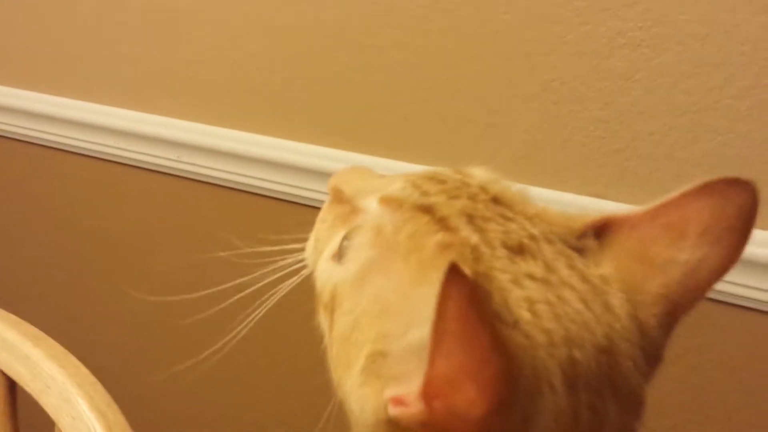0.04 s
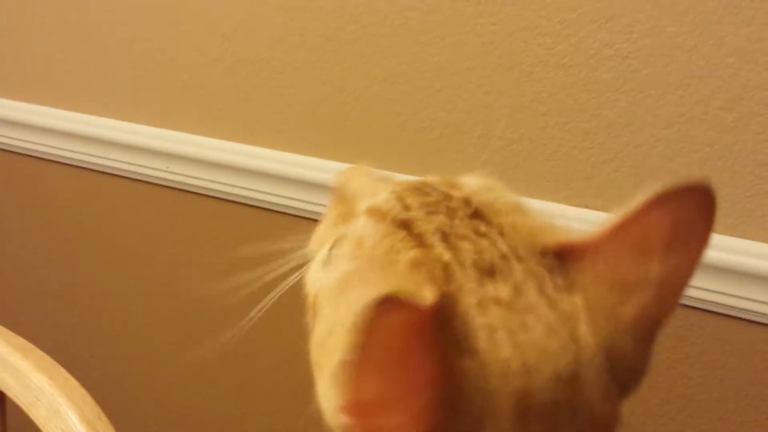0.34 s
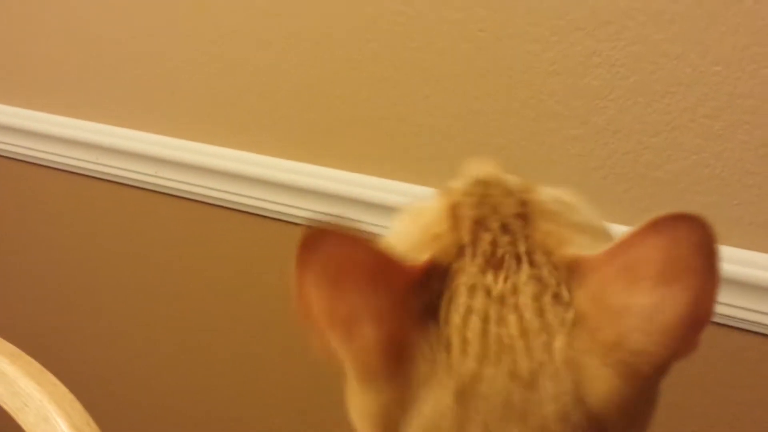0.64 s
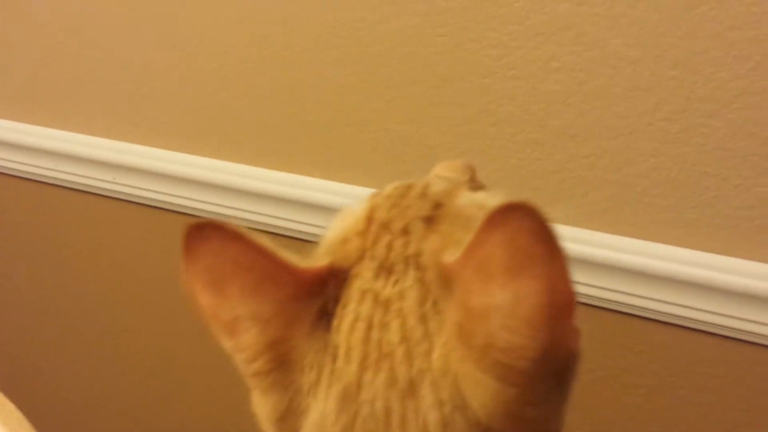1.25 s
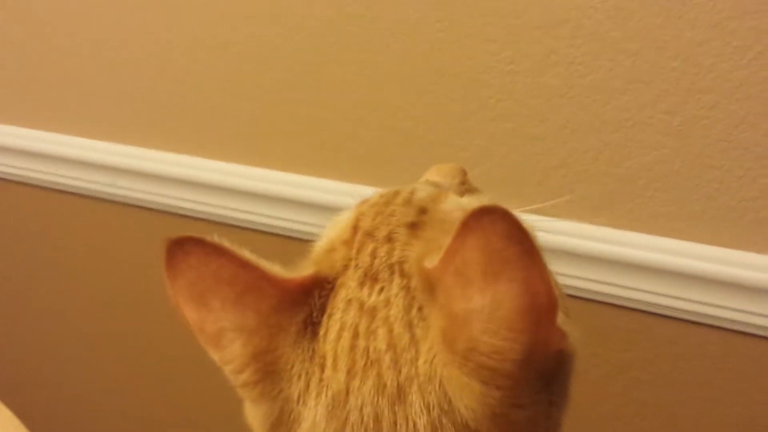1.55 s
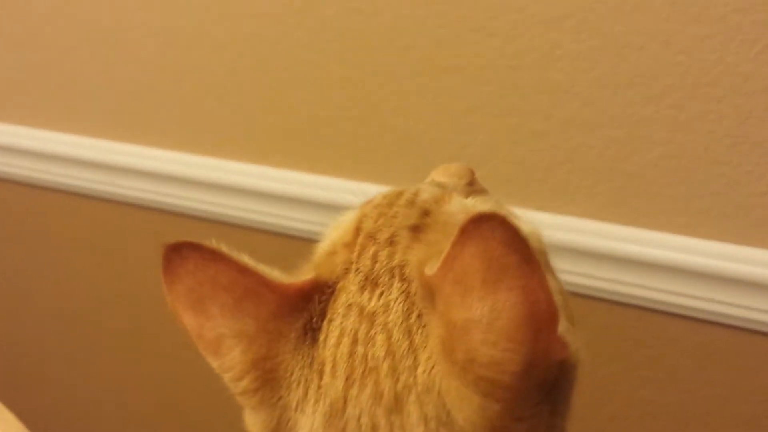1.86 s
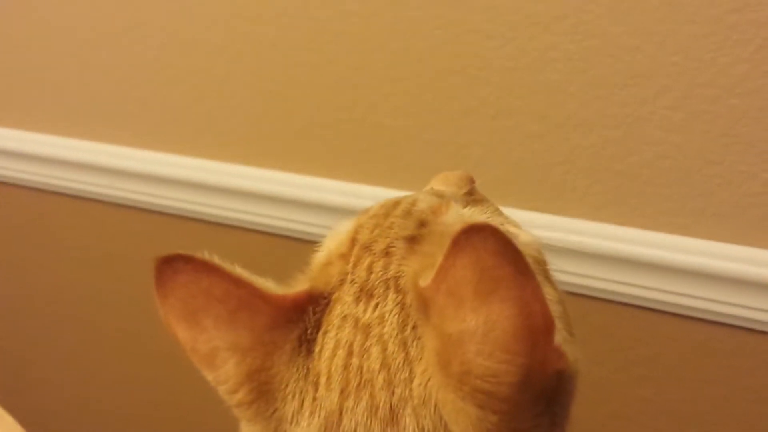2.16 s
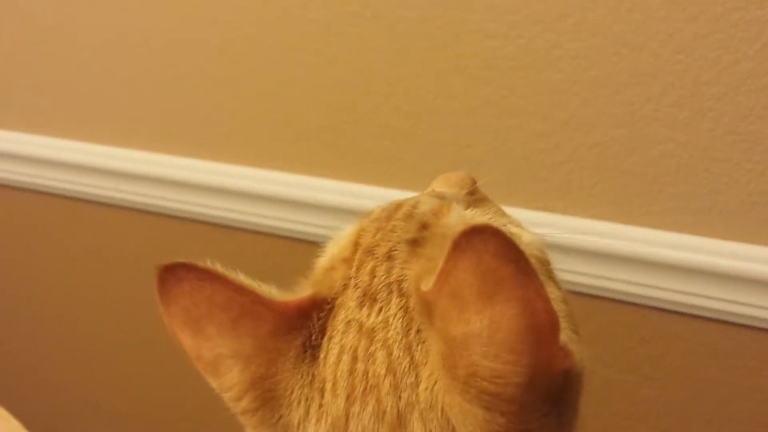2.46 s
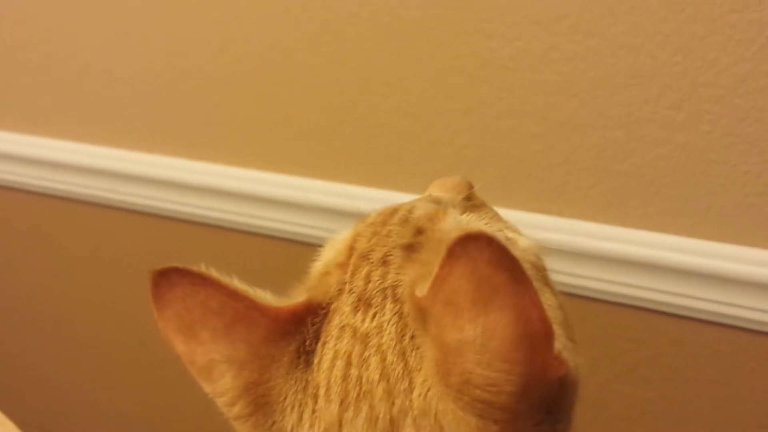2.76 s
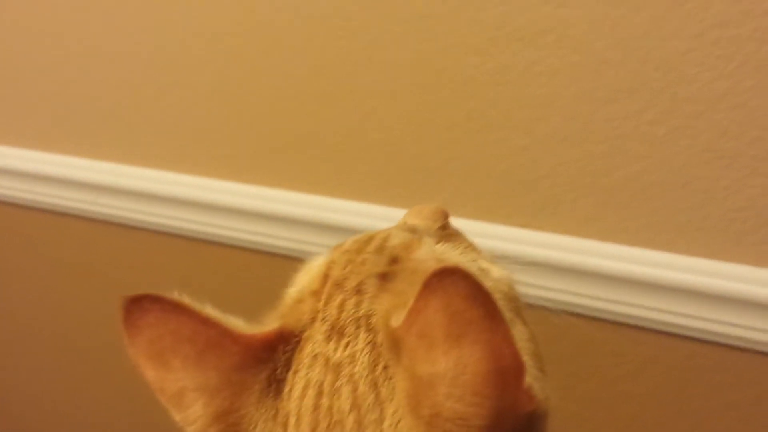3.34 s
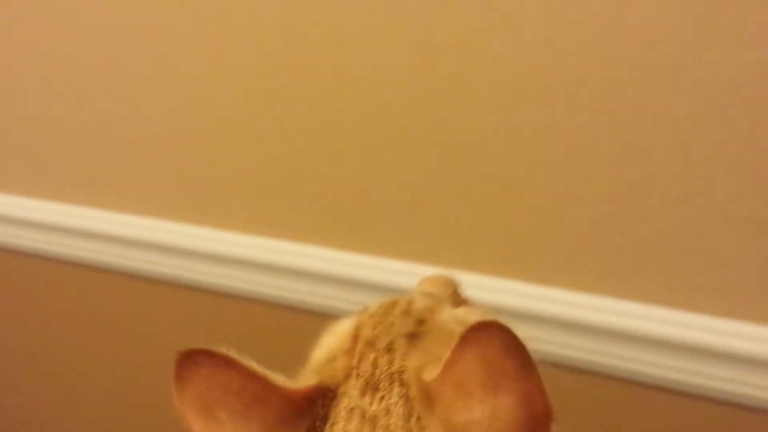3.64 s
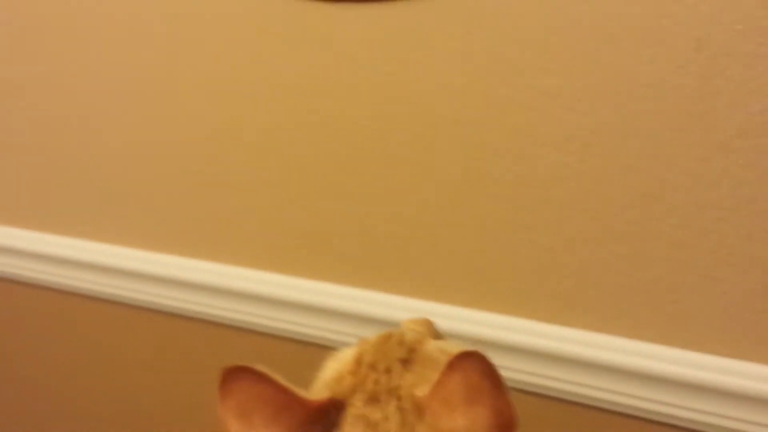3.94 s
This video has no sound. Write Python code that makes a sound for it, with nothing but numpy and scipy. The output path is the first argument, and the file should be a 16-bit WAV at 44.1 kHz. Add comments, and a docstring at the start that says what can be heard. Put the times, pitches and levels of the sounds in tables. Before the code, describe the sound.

A cat close to the microphone chatters in seven short, slightly raspy chirps, with faint breathy puffs between them. It sounds a little to the left in a small room, over steady room noise and a low appliance hum.

```python
"""A cat close to the microphone chatters at something above it: seven short chirps in a small room.
In each the pitch dips as the jaw opens, a mouth resonance flares, and the voice breaks up into breath
as the jaw shuts. Between chirps come faint voiceless puffs. The cat is louder on the left, with a short
ring from the walls; behind it lie steady room tone and the hum of an appliance."""
import sys
import numpy as np
from scipy import signal
from scipy.fft import rfft, irfft
from scipy.io import wavfile

SR = 44100
rng = np.random.default_rng(int(sys.argv[2]) if len(sys.argv) > 2 else 0)


def persist_wave(psi):
    """Save psi, clipped to +-1, as 16-bit WAV."""
    counts = np.round(np.clip(psi, -1, 1) * 32767).astype(np.int16)
    wavfile.write(sys.argv[1], SR, np.atleast_2d(counts).T)


N = 176400
T = np.arange(N) / SR


def from_db(db):
    """Decibels to gain."""
    return 10 ** (np.asarray(db) / 20)


def at_hz(points, hz):
    """Read a table on a log-frequency axis."""
    f, value = np.transpose(points)
    return np.interp(np.log(np.maximum(hz, 1)), np.log(f), value)


def rms_one(x):
    """Scale to unit level."""
    return x / np.sqrt(np.mean(x ** 2) + 1e-20)


def coloured(x, gain):
    """Filter by a gain given as a function of frequency."""
    return irfft(rfft(x) * gain(np.arange(N // 2 + 1) * SR / N), N)


def noise(spectrum):
    """Unit noise with the given spectral shape."""
    return rms_one(coloured(rng.standard_normal(N), lambda f: from_db(at_hz(spectrum, f))))


def drift(rate_hz):
    """Slow random movement of spread 1."""
    return rms_one(coloured(rng.standard_normal(N), lambda f: 1 / (1 + (f / rate_hz) ** 2)))


def panned(x, balance):
    """Share a sound between left and right, band by band."""
    return coloured(x, lambda f: from_db(np.outer([1, -1], at_hz(balance, f)) / 2))


def resonance(hz, centre_hz, width_hz):
    """Gain of a resonance passed twice, 1 on top."""
    return 1 / (1 + ((hz ** 2 - centre_hz ** 2) / (hz * width_hz)) ** 2)


def room_tone():
    """Steady noise around the microphone, narrow in the bass and wide in the treble."""
    # Spectrum of the room noise: f/Hz, relative density/dB
    spectrum = [(20, -29), (36, -9), (60, -6), (125, -3.5), (200, -8), (300, -8), (400, -10.5),
                (700, -16.5), (880, -14), (1080, -23.5), (2100, -24), (3000, -29.5), (6000, -30),
                (7300, -28), (9000, -33.5), (14400, -36.5)]
    # Likeness of the two sides: f/Hz, left-right correlation
    likeness = [(30, 1), (125, 0.92), (250, 0.95), (500, 0.5), (1000, 0.0037), (2000, 0), (4000, 0),
                (12000, 0.033)]
    # Lean of the room noise: f/Hz, left minus right/dB
    balance = [(30, -17), (80, 6.5), (250, 2.2), (1000, 4), (3000, 3.5), (12000, -0.5)]
    mid = coloured(noise(spectrum), lambda f: np.sqrt((1 + at_hz(likeness, f)) / 2))
    side = coloured(noise(spectrum), lambda f: np.sqrt((1 - at_hz(likeness, f)) / 2))
    return from_db(-50.5) * panned(np.array([mid + side, mid - side]), balance)


def appliance_hum():
    """An appliance in the background, centred: each tone wavers in level and phase."""
    # Tones of the hum: f/Hz, level/dB, width/Hz
    tones = [(60.6, -69, 2), (118.5, -57, 1.84), (168.9, -61, 3), (229.6, -65, 3.6), (300.4, -66, 5.1),
             (473.3, -57.5, 15.5), (844, -71, 11), (903, -70, 6.3)]
    hum = np.zeros(N)
    for hz, db, width_hz in tones:
        waver = 1 + 0.58 * (drift(width_hz) + 1j * drift(width_hz))
        hum += from_db(db) * np.real(waver * np.exp(2j * np.pi * hz * T))
    return hum


def chirp(row, t, jitter, shimmer, flutter, air):
    """One call: harmonics leave by the nose, then the opening mouth; breath peaks as the jaw shuts."""
    # Voice through the nose, mouth closed: f/Hz, relative level/dB
    closed_mouth = [(550, 6), (800, -1.5), (1500, -10), (2300, -15.5), (3200, -30), (6000, -23),
                    (9000, -54)]
    # Upper resonances of the open mouth: f/Hz, relative level/dB
    upper_resonances = [(600, -27), (2000, -35), (3400, -23), (4200, -26.5), (4900, -3.5), (5600, -2.5),
                        (7000, -15.5), (9000, -50)]
    (_, opening, hold, closing, start_hz, open_hz, held_hz, shut_hz, bend, closed_db, open_db,
     mouth_hz, swell_db, upper_db, breath_db, roughness, throat_hz, throat_db, attack) = row
    release_s, jaw_shut_s, pitch_return_s, upper_linger_s = 0.024, 0.0074, 0.0056, 0.022
    jaw_range_db, flutter_db, nose_loss_db, nose_knee_hz = 16.5, 3, 23.5, 701.3
    hoarse_hz, hoarse_rad = 4700, 0.92
    breath_late_s, breath_rise_s, breath_fall_s = 0.018, 0.071, 0.023

    opened = np.clip(t / opening, 0, 1)
    held = np.clip((t - opening) / hold, 0, 1)
    after_hold = np.maximum(t - opening - hold, 0)
    shut = 1 - np.exp(-after_hold / pitch_return_s)
    jaw = from_db(jaw_range_db * (opened - 1)) * np.exp(-after_hold / jaw_shut_s)

    pitch = start_hz + (open_hz - start_hz) * opened ** bend
    pitch += (held_hz - open_hz) * held + (shut_hz - held_hz) * shut
    rough = roughness + 0.67 * shut * np.exp(-after_hold / release_s)  # the voice breaks on closing
    phase = 2 * np.pi * np.cumsum(pitch * (1 + 0.0432 * rough * jitter)) / SR
    harmonic = np.arange(1, len(flutter) + 1)[:, None]
    hz = harmonic * pitch

    low_note = np.clip((nose_knee_hz - pitch) / 60, 0, 1)  # low notes lose much of their nasal voice
    nose = from_db(closed_db + at_hz(closed_mouth, hz) - nose_loss_db * low_note)
    mouth = from_db(open_db + swell_db * (held - 1)) * jaw * resonance(hz, mouth_hz, width_hz=865)
    throat = from_db(throat_db) * resonance(hz, throat_hz, width_hz=415)
    upper = throat + from_db(upper_db + at_hz(upper_resonances, hz))
    upper *= opened ** 2 * np.exp(-after_hold / upper_linger_s)
    levels = np.sqrt(nose ** 2 + mouth ** 2 + upper ** 2)

    unsteady = from_db(flutter_db * flutter * np.minimum(harmonic / 5, 1))
    # High harmonics wander in phase and blur into rasp.
    blur = hoarse_rad * np.minimum(hz / hoarse_hz, 1.2) ** 3 * flutter[::-1]
    voice = np.sum(levels * unsteady * np.sin(harmonic * phase + blur), axis=0)
    onset = np.clip(t / attack, 0, 1)
    release = np.clip((opening + hold + closing - t) / release_s, 0, 1) ** 0.5
    voice *= release * (1 + 0.67 * rough * shimmer)

    past_peak = t - opening - hold - breath_late_s
    breath = np.exp(np.minimum(past_peak / breath_rise_s, -past_peak / breath_fall_s)) * air
    return onset * (voice + from_db(breath_db) * breath)


def chatter():
    """The cat's seven chirps, each with its own unsteadiness of pitch and level."""
    # Calls: t/s, jaw opening/s, hold/s, closing/s, pitch at start/Hz, when open/Hz, at end of hold/Hz,
    # when shut/Hz, bend of the fall, closed-mouth level/dB, open-mouth level/dB, mouth resonance/Hz,
    # swell over the hold/dB, upper resonances/dB, breath/dB, roughness (0-1), throat resonance/Hz,
    # its level/dB, attack/s
    calls = [ (.601, .029, .042, 0.056, 848, 782, 768, 893, 1.13, -41, -31, 1986, 9, -50.5, -62, 0.17, 3040, -47.5, 0.0074),
             (.920, .033, 0.023, 0.031, 839, 722.6, 748, 792, 1.76, -41, -43.5, 1310, -1.5, -50.5, -56.5, 0.11, 3170, -45.5, 0.01),
             (1.564, 0.036, 0.036, 0.045, 769, 696.4, 710, 750, 1.13, -41.5, -50, 1350, 7, -55.5, -58.5, 0, 3270, -49.5, 0.0095),
             (2.382, .036, 0.014, 0.027, 755.6, 570, 574, 583, 1.8, -41, -34, 1410, 5, -53, -46, .3, 3040, -45.5, 0.0086),
             (3.080, 0.048, 0.0375, 0.057, 725.6, 681, 653, 697, 1.72, -44, -39.5, 1450, 12, -54, -52, 0.35, 2570, -45.5, 0.022),
             (3.500, 0.033, 0.0344, 0.0414, 801, 632.6, 655, 711, 0.59, -42.5, -35.5, 1760, -3.5, -49.5, -52, 0.22, 2720, -50.5, 0.002),
             (3.762, .035, .031, 0.018, 739, 565, 634, 676, .8, -31, -36, 1450, 0, -50.5, -49, 0.13, 2450, -47.5, 0.015)]
    # Breath in the calls: f/Hz, relative density/dB
    breath_spectrum = [(400, -11), (800, -3.5), (1700, -1), (2900, -2), (4100, -7), (5500, 0), (7500, -4),
                       (9500, -21.5), (14000, -64)]
    jitter, shimmer = drift(rate_hz=180), drift(rate_hz=160)
    air = noise(breath_spectrum)
    flutter = np.array([drift(rate_hz=115) for _ in range(14)])  # one per harmonic
    out = np.zeros(N)
    for row in calls:
        start = int(row[0] * SR)
        part = slice(start, start + SR // 4)
        out[part] += chirp(row, T[part] - T[start], jitter[part], shimmer[part], flutter[:, part], air[part])
    return out


def puffs(rise_s=0.016):
    """Soft voiceless pushes of air from the cat's twitching jaw."""
    # Pushes of air: t/s, level/dB
    pushes = [(1.18, -53), (1.691, -54), (1.746, -56), (1.82, -53), (1.88, -56.5), (1.974, -54.5),
              (2.035, -56.5), (2.23, -56), (2.594, -55.5), (2.665, -62), (2.797, -58.5), (3.667, -59)]
    # Spectrum of a puff: f/Hz, relative density/dB
    spectrum = [(400, -3), (880, 8), (1150, -7.5), (1500, -5), (2100, 0.5), (3000, -14), (6000, -10.5),
                (14000, -31)]
    envelope = np.zeros(N)
    for start_s, db in pushes:
        age = np.clip((T - start_s) / rise_s, 0, 20)
        envelope += from_db(db) * age * np.exp(1 - age)
    return envelope * noise(spectrum)


def wall_reflections(x, t60_s=0.2, first_s=0.0013, cut_hz=8100):
    """Dense, quickly dying reflections of a small room, different at each side."""
    t = T[:SR // 2]
    tail = rng.standard_normal((2, len(t))) * from_db(-60 * t / t60_s) * (t > first_s)
    tail /= np.sqrt(np.sum(tail ** 2, axis=1, keepdims=True))
    tail = signal.sosfilt(signal.butter(1, cut_hz, fs=SR, output="sos"), tail)
    return from_db(-7) * signal.fftconvolve(x[None], tail, axes=1)[:, :N]


def scene():
    """The cat close up, louder on the left, with its reflections, the room tone and the hum behind."""
    # Lean of the cat at the microphone: f/Hz, left minus right/dB
    cat_balance = [(400, -1), (700, 3.5), (1250, 6.5), (2200, 7.3), (3200, 3.5), (4200, -1), (7700, 12)]
    right_lead_s = 73e-6
    cat = chatter() + puffs()
    direct = np.array([cat, np.interp(T + right_lead_s, T, cat)])
    return panned(direct + wall_reflections(cat), cat_balance) + room_tone() + appliance_hum()


def record(dry, cutoff_hz=14600):
    """The top is cut steeply."""
    return coloured(dry, lambda f: np.clip((cutoff_hz - f) / 100 + 1, 0, 1))


dry = scene()
out = record(dry)
persist_wave(out)
```